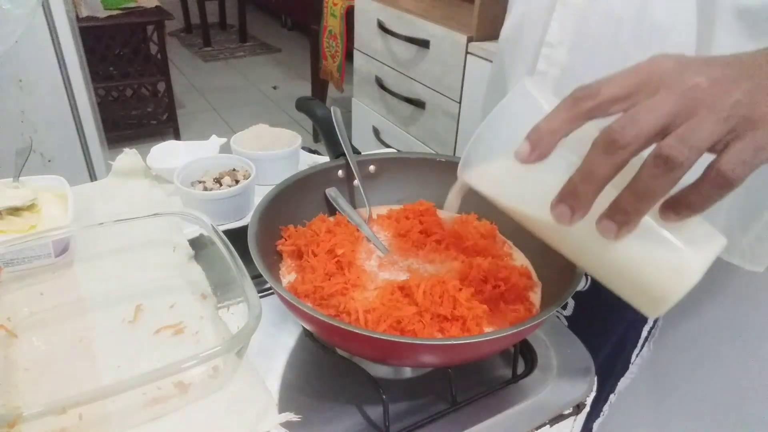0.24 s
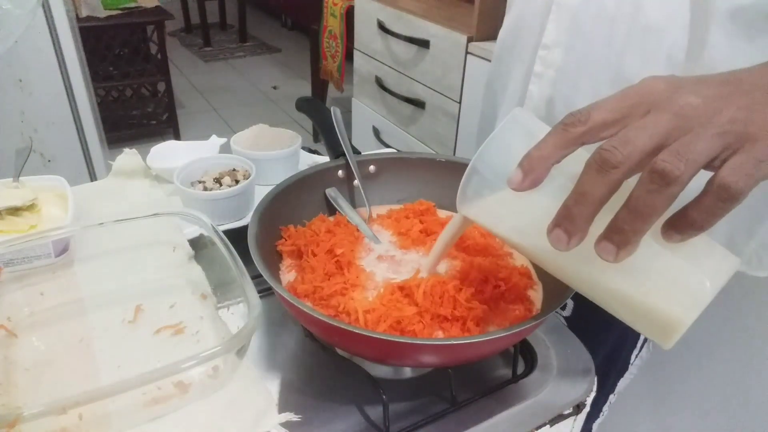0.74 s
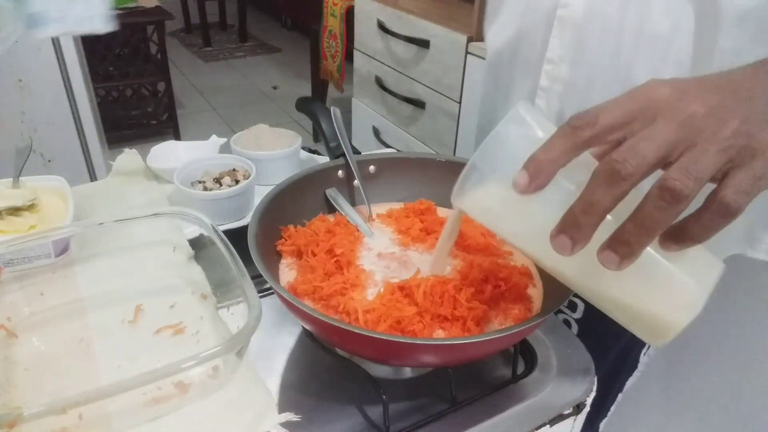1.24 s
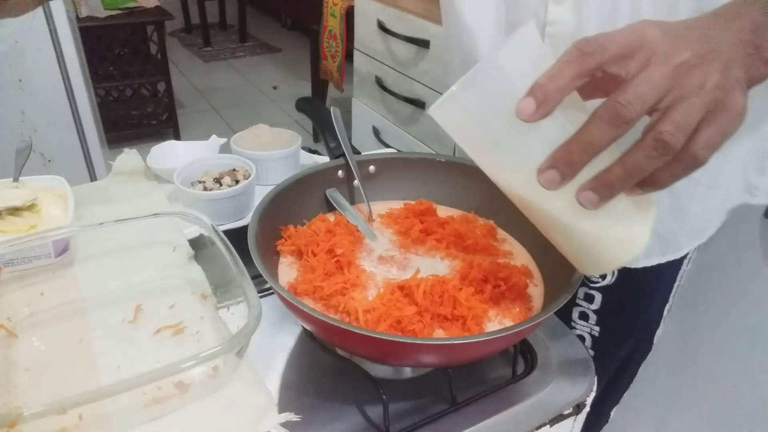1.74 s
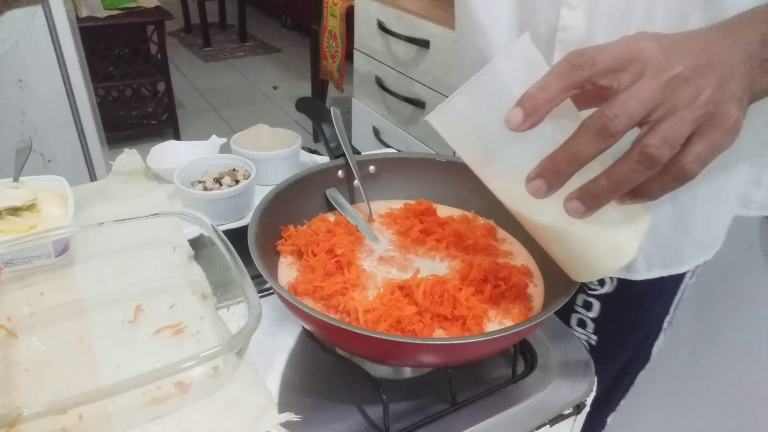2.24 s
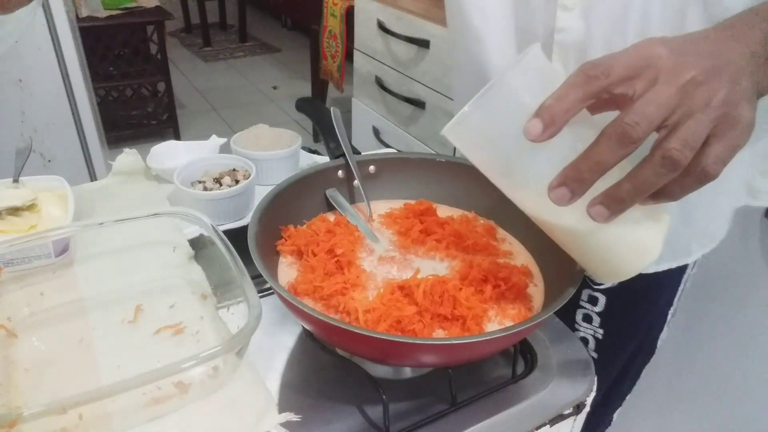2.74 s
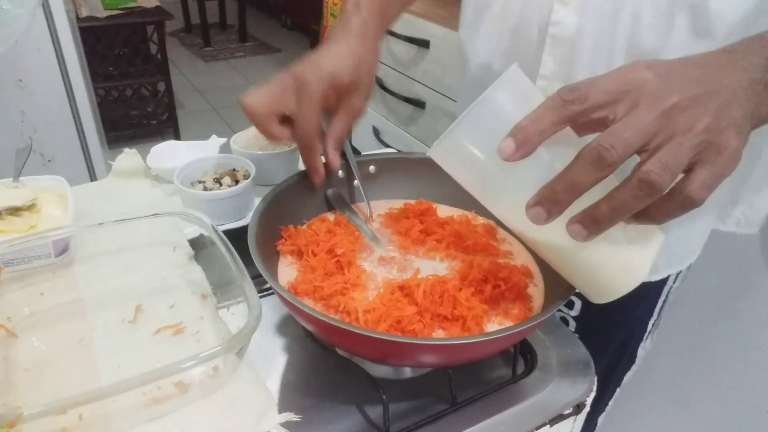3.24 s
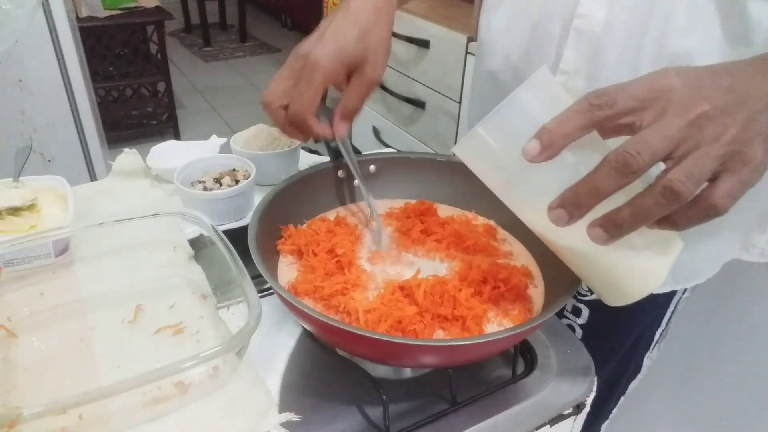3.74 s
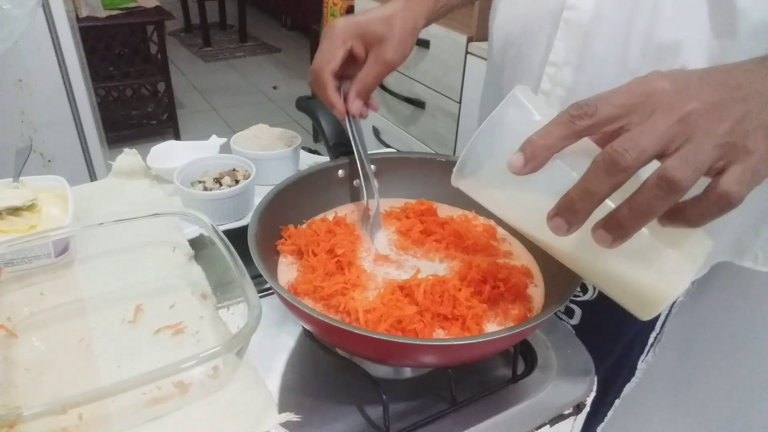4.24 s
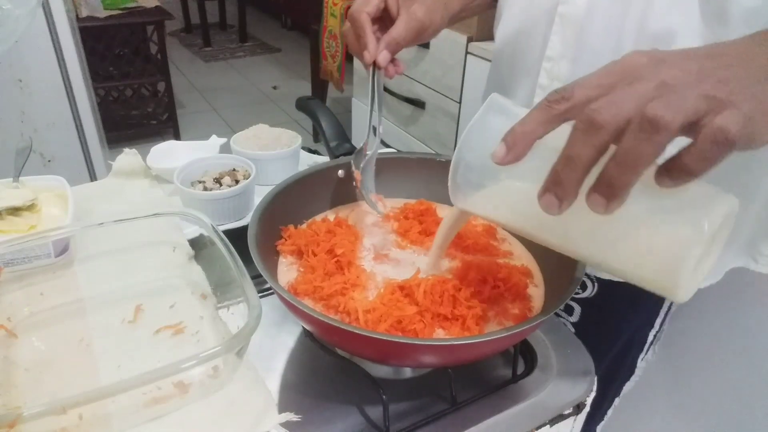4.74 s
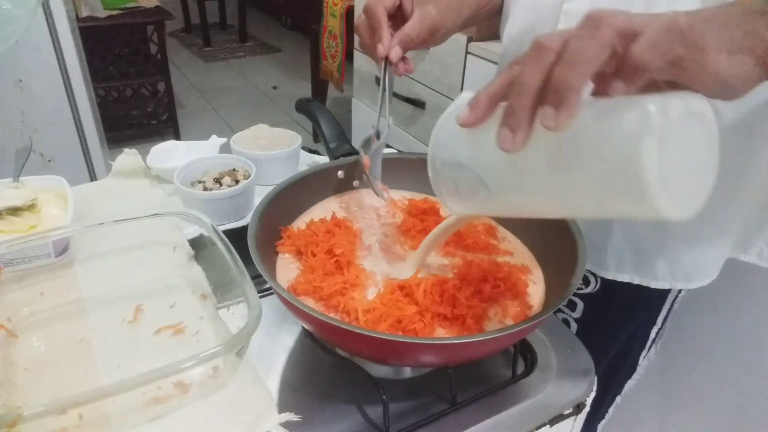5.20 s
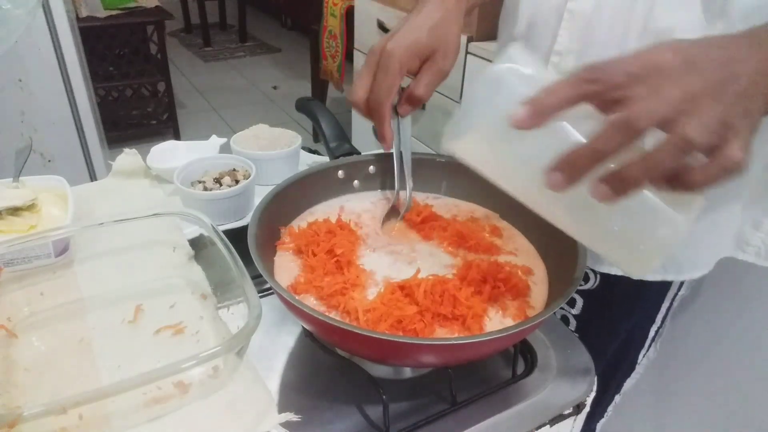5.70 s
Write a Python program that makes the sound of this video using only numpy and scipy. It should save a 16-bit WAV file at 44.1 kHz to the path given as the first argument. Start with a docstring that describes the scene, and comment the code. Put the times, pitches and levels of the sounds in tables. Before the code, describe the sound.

A close microphone in a small, hard-walled kitchen picks up quiet low air, a steady motor hum and a thin high whine that rises slightly near the end. From about 0.2 to 1.6 s milk runs gently onto grated carrot in a frying pan: soft gurgling, fine patter and single drips, strongest near 0.5 s, thinning, then swelling briefly at 1.5 s. At 1.7 s something is shoved roughly over the counter, with short squeaky chattering skids until 2.2 s; faint dull thuds and hollow knocks continue to 3.1 s. At 3.5 to 3.7 s a metal spoon taps, scrapes and knocks in the pan, and at 4.0 s comes the loudest sound, a hard clank with a short damped ring. A light, thin tap follows at 4.5 s. The second pour begins faintly around 4.9 s, strengthens after 5.3 s with crisp splashes and bright drips near 5.5 to 5.6 s, then tapers into trickling.

```python
"""You hear milk poured twice from a jug onto grated carrot in a frying pan, in a small humming kitchen.
The soft stream gurgles and patters as crowds of bubble notes, and sheds splashes and single drips.
Between the pours something skids and bumps on the counter, made of coloured tiny impacts; then a metal spoon
scrapes along the pan and knocks against it, made of noise bursts and fading modes.
The microphone takes each of these directly and off the walls, over still air, a motor's hum and a thin whine."""
import sys
import numpy as np
from scipy import signal
from scipy.fft import rfft, irfft
from scipy.io import wavfile

SR = 44100
rng = np.random.default_rng(int(sys.argv[2]) if len(sys.argv) > 2 else 0)


def digitize_waveform(pressure):
    """Quantize a signal to 16-bit integers and store it at the path in sys.argv[1].

    Rows of a 2-D input are taken as channels; values are limited to [-1, 1].
    """
    field = np.atleast_2d(pressure).T
    bounded = np.clip(field, -1, 1)
    quanta = np.round(bounded * 32767).astype(np.int16)
    wavfile.write(sys.argv[1], SR, quanta)


N = 262920
TIME = np.arange(N) / SR  # s


# The loudest single bubbles and drips: start_s, level_db [peak, dB], pitch_hz, fade_cycles [at least 1 is used]
DRIPS = [(0.3682, -42, 7860, 2.9), (0.373, -42.5, 4260, 7.8), (0.3892, -42, 1026, 3.4),
         (0.467, -58, 1750, 8.2), (0.541, -46, 4230, 5.5), (0.6, -39.5, 10800, 0.97),
         (0.858, -43.5, 7140, 3.3), (1.003, -49.5, 6770, 5.8), (1.267, -52.5, 4600, 9.2),
         (1.358, -47.5, 4400, 2.6), (1.388, -62.5, 2540, 19), (1.498, -56.5, 1756, 9.2),
         (1.521, -42.5, 11470, 9.6), (1.546, -37.5, 3280, 3.5), (5.037, -45.5, 8120, 8.1),
         (5.3278, -43, 5530, 4.9), (5.348, -63, 1330, 32), (5.432, -33.5, 7940, 0.9),
         (5.481, -43, 1044, 4.8), (5.482, -39, 9900, 5), (5.495, -41.5, 1790, 2.9),
         (5.5239, -31, 7400, 3.7), (5.529, -26, 12240, 3.3), (5.5565, -43, 7500, 4.7),
         (5.5901, -23.5, 4250, 1.32), (5.7365, -32, 4690, 2.2)]


def milk(snap_db=-16):
    """The stream sinks into the carrot as a low slosh and large, small and tiny bubbles; single drips stand out."""
    gurgle, patter, spray = stream()
    slosh = froth(330, 900, per_s=900, cycles=4.8, spread_db=2)
    large = froth(850, 2100, per_s=500, cycles=6, spread_db=3)
    blips = froth(1100, 2300, per_s=60, cycles=14, spread_db=2.5)
    small = froth(2600, 8300, per_s=1100, cycles=6, spread_db=3.5)
    tiny = froth(10500, 12200, per_s=600, cycles=3.8, spread_db=1.5)

    out = gurgle * (gain_of(-7) * slosh + gain_of(-5) * large + gain_of(-8.5) * blips)
    out += gain_of(-4.5) * patter * small
    out += gain_of(-0.5) * spray * tiny
    for start_s, level_db, pitch_hz, fade_cycles in DRIPS:
        add(out, start_s, gain_of(level_db) * bubble(pitch_hz, max(fade_cycles, 1)))
        film_snap = bubble(6600, 1 / 2)  # the film snaps as it opens
        add(out, start_s, gain_of(level_db + snap_db) * film_snap)
    return out


# Strength of the stream, one list for each of the two pours: time_s, flow_db [relative]
POURS = [
    [(0.22, -20), (0.36, -17), (0.48, -4), (0.6, -8.5), (0.76, -17.5), (1.0, -21.5), (1.3, -20),
     (1.55, -9.5), (1.63, -56)],
    [(4.85, -38), (5.0, -34.5), (5.25, -28.5), (5.36, -6.5), (5.49, -5), (5.58, -2), (5.7, -15.5),
     (5.82, -11.5), (5.96, -17.5)],
]
# Splashes where the stream meets fresh carrot: start_s, swell_s, fade_s [time constant],
# patter_db, spray_db [dB, before the bubble mix]
SPLASHES = [(0.355, 0.032, 0.032, -54.5, -65.5), (0.56, 0.018, 0.013, -62, -66),
            (0.8, 0.012, 0.04, -71, -71.5), (1.07, 0.021, 0.13, -61.5, -80),
            (1.49, 0.034, 0.038, -61.5, -68), (5.005, 0.04, 0.032, -63.5, -82),
            (5.38, 0.095, 0.02, -53, -64), (5.52, 0.0035, 0.018, -39, -55),
            (5.586, 0.0052, 0.011, -43.5, -68), (5.8, 0.006, 0.16, -58.5, -70)]


def stream(gurgle_db=-55.5, gurgle_power=1.153, patter_db=-57, patter_power=0.93, spray_db=-76.5, spray_power=0.68):
    """Gains of gurgle, patter and spray: each follows a power of the flow; splashes add to the brighter two."""
    flow = sum(level(*np.transpose(pour)) for pour in POURS)
    splash_patter, splash_spray = surges(SPLASHES, start_db=-7)
    gurgle = gain_of(gurgle_db) * flow ** gurgle_power
    patter = np.hypot(gain_of(patter_db) * flow ** patter_power, splash_patter)
    spray = np.hypot(gain_of(spray_db) * flow ** spray_power, splash_spray)
    return gurgle, patter, spray


def bubble(hz, cycles, glide=0.018):
    """A bubble's note: a quick start, a fade, and a slight rise in pitch; peak 1."""
    seconds = np.arange(int(6 * cycles / hz * SR) + 8) / SR
    age = seconds * hz / cycles  # in fade times
    envelope = np.exp(-age) * (1 - np.exp(-6 * age))
    note = envelope * np.sin(2 * np.pi * cycles * age * (1 + glide * age))
    return note / abs(note).max()


def froth(low_hz, high_hz, per_s, cycles, spread_db, count=20):
    """A crowd of small bubbles, set off at random in many sizes; rms 1."""
    pitches = np.geomspace(low_hz, high_hz, count) * rng.uniform(.97, 1.03, count)
    crowd = np.zeros(N)
    for hz in pitches:
        starts = grit(per_s / count, spread_db)
        crowd += evened(signal.oaconvolve(starts, bubble(hz, cycles))[:N])
    return evened(crowd)


# Spoon blows: start_s, clack_db, bright_db [dB per octave], lowest_hz [of the crack],
# pan_ring_db, spoon_ring_db, favoured_hz [pitch the point of contact favours]; levels before the mix
BLOWS = [(3.5054, -39, 1, 584, -67, -44, 7450), (3.589, -25.5, -2, 510, -50.5, -64, 3406),
         (3.695, -26, 31, 2000, -68, -75, 13460), (3.7186, -21, -0.5, 227, -49, -61.5, 1638),
         (4.027, -12.5, 0.5, 145, -27.5, -38.5, 4876), (4.5247, -29.5, 1, 1020, -73.5, -45.5, 3844)]
# Spectrum of the crack: pitch_hz, level_db [relative]
CLACK_SPECTRUM = [(100, 0), (300, -6), (600, -3), (1100, -1), (2100, 1), (2500, 1.5), (4400, 3.5),
                  (5500, 4.5), (8000, -0.5), (9200, -3), (14000, -6), (16000, -26.5)]
# Pitches of the pan's modes: pitch_hz
PAN_HZ = [150, 324.7, 895, 1138, 1302, 1638, 1928, 2207, 2720, 3406, 4157, 4876, 6368, 7892, 9860, 13460]
# The same modes of the pan: level_db [relative], t60_s
PAN_MODES = [(-19, 0.95), (-0.5, 0.48), (-22, 0.4), (-2.5, 0.27), (-28, 0.25), (-2, 0.18), (-5.5, 0.17),
             (-2.5, 0.26), (-11, .26), (-3, 0.19), (1, 0.28), (-10, 0.33), (-5, 0.16), (-6, 0.2),
             (-16, .22), (-7, 0.25)]
# Pitches of the spoon's modes: pitch_hz
SPOON_HZ = [2401, 3004, 3510, 3844, 4538, 5986, 6756, 7450, 12110]
# The same modes of the spoon: level_db [relative], t60_s
SPOON_MODES = [(-5, 0.16), (3, 0.13), (1.5, 0.18), (-10, 0.39), (-6.5, 0.5), (-21.5, .22), (-24.5, .25),
               (-3, 0.088), (-15, 0.21)]


def clacks(contact_s=0.0019, rattle_db=-13, rattle_s=0.027):
    """Each blow is a short crack and a brief rattle against the damped metal; light taps have no bass."""
    out, t = np.zeros(N), TIME[:SR // 4]
    for start_s, clack_db, bright_db, lowest_hz, pan_db, spoon_db, favoured_hz in BLOWS:
        envelope = np.exp(-t / contact_s) + gain_of(rattle_db) * np.exp(-t / rattle_s)
        burst = rng.standard_normal(len(t)) * envelope
        no_bass = signal.lfilter(*signal.butter(3, lowest_hz, "high", fs=SR), burst / 2)
        crack = colour(no_bass, CLACK_SPECTRUM, bright_db)
        metal = gain_of(pan_db) * ring(PAN_HZ, PAN_MODES, bloom_cycles=0.41, favoured_hz=favoured_hz)
        metal += gain_of(spoon_db) * ring(SPOON_HZ, SPOON_MODES, bloom_cycles=0.27, favoured_hz=favoured_hz)
        damped = pressed(crack, metal, damping_s=0.0025)
        add(out, start_s, gain_of(clack_db) * (gain_of(-2) * crack + gain_of(-7) * damped))
    return out


def ringing():
    """The modes of the pan and the spoon ring on after each blow."""
    out = np.zeros(N)
    for start_s, *_, pan_db, spoon_db, favoured_hz in BLOWS:
        pan = ring(PAN_HZ, PAN_MODES, bloom_cycles=9.1, favoured_hz=favoured_hz)
        spoon = ring(SPOON_HZ, SPOON_MODES, bloom_cycles=1.7, favoured_hz=favoured_hz)
        add(out, start_s, gain_of(pan_db) * pan)
        add(out, start_s, gain_of(spoon_db) * spoon)
    return gain_of(-3) * out


# Strokes of the spoon along the pan: start_s, swell_s, fade_s [time constant],
# scrape_db, hiss_db [dB, before the mix]
STROKES = [(3.508, 0.0063, 0.0064, -40, -42.5), (3.605, 0.038, 0.011, -30.5, -42.5),
           (3.725, 0.013, 0.08, -61, -46), (3.848, 0.013, 0.012, -75, -47.5)]
# Spectrum of the catching and slipping: pitch_hz, level_db [relative]
SCRAPE_SPECTRUM = [(100, -15), (400, -13), (800, -5), (1500, -6.5), (2600, -5), (4200, -7.5), (6300, -6),
                   (7000, -16), (9000, -27), (15000, -42.5)]
# Spectrum of the finer grazing: pitch_hz, level_db [relative]
HISS_SPECTRUM = [(1500, -34), (4400, 17.5), (5500, 5.5), (8200, 17.5), (9500, -6.5), (12000, 8),
                 (16000, -8)]


def scrape():
    """The spoon's edge catches and slips on the pan, which rings briefly under it."""
    bite, graze = surges(STROKES, start_db=-9.5)
    slips = colour(bite * grit(per_s=2700, spread_db=4), SCRAPE_SPECTRUM)
    metal = ring(PAN_HZ[3:], PAN_MODES[3:], bloom_cycles=2, favoured_hz=3406, favour_db=5)
    sung = pressed(slips, metal, damping_s=0.012)
    hiss = colour(graze * grit(per_s=8000, spread_db=2), HISS_SPECTRUM)
    return gain_of(-7) * slips + gain_of(-8) * sung + gain_of(-4.5) * hiss


def ring(pitches, modes, bloom_cycles, favoured_hz=0, favour_db=7, split=0.018, twin_db=-8):
    """Ringing metal: modes over 1 kHz have a close, quieter twin; each swells over some cycles, low ones later."""
    t, out = TIME[:SR * 3 // 4], 0
    for hz, (level_db, t60_s) in zip(pitches, modes):
        lift_db = favour_db * np.exp(-abs(favoured_hz / hz - 1) * 20)
        fade = gain_of(-60 * t / t60_s)
        bloom = 1 - np.exp(-t * hz / bloom_cycles)
        twin_tone = np.sin(2 * np.pi * (hz * (1 + split) * t + rng.random()))
        twin = gain_of(twin_db) * (hz > 1000) * np.sqrt(fade) * twin_tone
        tone = np.sin(2 * np.pi * (hz * t + rng.random()))
        out = out + gain_of(level_db + lift_db) * fade * bloom * (tone + twin)
    return out


def pressed(x, metal, damping_s):
    """Sound passed through ringing metal that is damped by the contact; unit energy gain."""
    short = metal * np.exp(-TIME[:len(metal)] / damping_s)
    return signal.oaconvolve(x, short / np.linalg.norm(short))[:len(x)]


# Something shoved over the counter in skids: start_s, swell_s, fade_s [time constant],
# rasp_db, chatter_db [dB, before the mix]
SKIDS = [(1.722, 0.05, 0.049, -37, -49), (1.995, 0.027, 0.01, -69, -54), (2.049, 0.0027, 0.048, -62, -51),
         (2.097, 0.021, 0.02, -51, -37.5), (2.16, 0.008, 0.01, -66, -60), (2.2, 0.005, 0.033, -85, -48)]
# Spectrum of the rough shove: pitch_hz, level_db [relative]
RASP_SPECTRUM = [(60, -9), (130, -2), (500, -5.5), (1200, -3), (1700, -1.5), (2400, -1), (3400, -7),
                 (4600, -5.5), (5400, -17), (5800, -10), (6500, -23), (8100, -19), (8800, -30),
                 (15000, -33.5)]
# Spectrum of the chattering skids: pitch_hz, level_db [relative]
CHATTER_SPECTRUM = [(700, -21), (1100, -29), (1350, -0.5), (1550, -2), (1750, 2.5), (2100, 2.5),
                    (2650, -0.5), (3200, -15), (4100, -4), (5200, -18.5), (7900, -19.5), (9000, -34)]


def slide(squeak_hz=1780, squeak_width_hz=200):
    """A rough shove, then short chattering skids with a squeaky resonance in them."""
    shove, judder = surges(SKIDS, start_db=-11)
    rasp = colour(shove * grit(per_s=3900, spread_db=3), RASP_SPECTRUM)
    skids = colour(judder * grit(per_s=650, spread_db=1), CHATTER_SPECTRUM)
    squeak = signal.lfilter(*signal.iirpeak(squeak_hz, squeak_hz / squeak_width_hz, SR), skids)
    return gain_of(-1) * rasp + gain_of(-4.5) * (skids + squeak)


# Dull judders of the counter: start_s, length_s, thud_db, knock_db [dB, before the mix], knock_hz
BUMPS = [(1.893, 0.04, -52.5, -46, 612), (1.952, 0.081, -53, -47.5, 634), (2.1, 0.038, -52, -40.5, 593),
         (2.355, 0.036, -88, -51.5, 615), (2.713, 0.04, -53, -52, 587), (2.749, 0.047, -54, -43, 631),
         (2.814, 0.031, -71, -39, 675), (2.835, 0.075, -50.5, -47, 609), (3.039, 0.041, -52.5, -47.5, 752),
         (3.055, 0.022, -79, -38.5, 703)]
# Spectrum of the thud: pitch_hz, level_db [relative]
THUD_SPECTRUM = [(50, -22), (100, -3.5), (170, 0.5), (330, -4.5), (600, -7), (900, -18), (1300, -30),
                 (1750, -20.5), (2500, -34.5), (8000, -34.5), (15000, -46)]


def bumps(ring_share=0.31):
    """Runs of small slips shake the counter: a juddering thud together with a hollow, fading knock."""
    out, slips, t = np.zeros(N), grit(per_s=2500, spread_db=0.5), TIME[:SR // 4]
    for start_s, length_s, thud_db, knock_db, knock_hz in BUMPS:
        push = np.zeros(len(t))
        span = min(int(length_s * SR), len(t))
        push[:span] = evened(slips[int(start_s * SR):][:span] * signal.windows.tukey(span, .3))
        envelope = np.exp(-t / (ring_share * length_s)) * (1 - np.exp(-t * knock_hz))
        knock = envelope * np.sin(2 * np.pi * knock_hz * t)
        add(out, start_s, gain_of(thud_db) * colour(push, THUD_SPECTRUM))
        add(out, start_s, gain_of(knock_db) * knock)
    return gain_of(-3) * out


# Still air in the kitchen: pitch_hz, level_db [per Hz, relative]
AIR_SPECTRUM = [(25, -27.5), (45, -4), (60, -8.5), (85, 1), (130, -1), (250, -4.5), (430, -8.5),
                (600, -4.5), (800, -14), (1500, -21), (2500, -23), (6000, -22), (9000, -27), (15500, -23)]
# A motor's steady low lines: pitch_hz
HUM_HZ = [59.2, 118.4, 177.2, 528.6, 588.3, 1116]
# Level of each low line: level_db [rms, dB]
HUM_DB = [-77, -79.5, -73.5, -74.5, -79.5, -91]
# Two swells of the hum's note near 530 Hz: start_s, swell_s, fade_s [time constant], level_db [before the mix]
HUM_SWELLS = [(0, 0.014, 0.15, -65), (0.78, 0.13, 0.22, -61)]
# The motor's thin high lines: pitch_hz
WHINE_HZ = [4232, 7058, 7208, 7359, 7515, 10637]
# Level of each high line: level_db [rms before the slow drift, dB]
WHINE_DB = [-73.5, -91.5, -78, -82.5, -87, -85.5]
# Spectrum of the hiss around the whine: pitch_hz, level_db [relative]
WHINE_HISS = [(3900, -40), (4130, -19.5), (4230, -9.5), (4340, -8), (4600, -13), (4850, -22.5), (6700, -42),
              (7250, -15.5), (7900, -16), (8300, -43)]
# Slow drift of the whine and its hiss: time_s, gain_db
WHINE_DRIFT = [(0, -6.5), (3.6, -5.5), (4.7, -8), (6, -2.5)]


def background():
    """Still air as coloured noise, a motor's hum, and a thin whine that sinks, then rises near the end."""
    air = gain_of(-71) * colour(rng.standard_normal(N + SR), AIR_SPECTRUM)[SR:]  # filter start-up cut off
    note = gain_of(-4) * lines([532], [0]) + gain_of(-4) * narrow(510, 110)
    hum = lines(HUM_HZ, HUM_DB) + surges(HUM_SWELLS, start_db=-8)[0] * note
    whine = lines(WHINE_HZ, WHINE_DB)
    whine += gain_of(-72.5) * colour(rng.standard_normal(N), WHINE_HISS)
    drift = gain_of(np.interp(TIME, *np.transpose(WHINE_DRIFT)))
    return air + hum + whine * drift


def lines(pitches, levels_db, waver=0.28):
    """Steady tones, each with a slightly wavering skirt of narrow noise."""
    out = np.zeros(N)
    for hz, level_db in zip(pitches, levels_db):
        tone = np.sqrt(2) * np.sin(2 * np.pi * (hz * TIME + rng.random()))
        out += gain_of(level_db) * (tone + waver * narrow(hz, 7.4))
    return out


def narrow(hz, width_hz):
    """A wavering line: noise in a narrow band, rms 1."""
    f = np.fft.rfftfreq(N, 1 / SR)
    band = 1 / (1 + (2 * (f - hz) / width_hz) ** 2)
    return evened(irfft(rfft(rng.standard_normal(N)) * band, N))


# Decay of the kitchen's reflections: pitch_hz, t60_s
ROOM_DECAY = [(100, 0.67), (400, 0.75), (1000, 0.43), (3000, 0.37), (7000, 0.34), (15000, 0.31)]


def kitchen(x, first_s=0.0038):
    """Reflections from hard walls: sparse random taps, each band dying at its own speed; unit energy."""
    taps = rng.standard_normal(SR) * (rng.random(SR) < 4000 / SR) * (TIME[:SR] > first_s)
    hz, t, bands = signal.stft(taps, SR, nperseg=256)
    decay = gain_of(-60 * t / read(ROOM_DECAY, hz)[:, None])
    tail = signal.istft(bands * decay, SR, nperseg=256)[1]
    return signal.oaconvolve(x, tail / np.linalg.norm(tail))[:N]


def gain_of(db):
    """Decibels to amplitude."""
    return 10 ** (np.asarray(db) / 20)


def evened(x):
    """Scales to rms 1."""
    return x / np.sqrt(np.mean(x ** 2) + 1e-20)


def read(points, hz):
    """A table of (pitch_hz, value), joined on a log axis."""
    f, value = np.transpose(points)
    return np.interp(np.log(hz + 1), np.log(f + 1), value)


def level(s, db):
    """A gain curve over the whole scene, silent outside its points."""
    return gain_of(np.interp(TIME, s, db)) * (TIME >= s[0]) * (TIME <= s[-1])


def surge(start_s, swell_s, fade_s, start_db):
    """A gain curve that sets in at start_db, swells to full strength, then dies away."""
    age, swell_s = TIME - start_s, max(swell_s, 1e-3)
    swell = gain_of(start_db * np.clip(1 - age / swell_s, 0, 1))
    fade = np.exp(-np.maximum(age - swell_s, 0) / fade_s)
    return (age >= 0) * swell * fade


def surges(rows, start_db):
    """Rows of (start_s, swell_s, fade_s, level_db, ..) to one gain curve for each level column."""
    return sum(np.outer(gain_of(levels_db), surge(start_s, swell_s, fade_s, start_db))
               for start_s, swell_s, fade_s, *levels_db in rows)


def add(mix, start_s, sound):
    """Mixes a sound in at its start time, cut at the end of the scene."""
    part = mix[max(round(start_s * SR), 0):][:len(sound)]
    part += sound[:len(part)]


def colour(x, points, tilt_db=0, size=4096):
    """Causal minimum-phase filter of unit energy with the given spectrum, tilted per octave above 500 Hz."""
    hz = abs(np.fft.fftfreq(size, 1 / SR))
    tilt = tilt_db * np.log2(np.maximum(hz, 500) / 4000)
    log_gain = np.log(gain_of(read(points, hz) + tilt))
    taps = np.fft.ifft(np.exp(np.conj(signal.hilbert(log_gain)))).real[:size // 2]
    return signal.oaconvolve(x, taps / np.linalg.norm(taps))[:len(x)]


def grit(per_s, spread_db):
    """Random tiny impacts, a few larger than the rest; rms 1."""
    size = gain_of(spread_db * np.minimum(rng.exponential(1, N), 3))
    hits = rng.choice([-1, 1], N) * (rng.random(N) < per_s / SR)
    return evened(size * hits)


def scene():
    """Pour, spoon and counter reach the microphone directly and by the walls; the background is added as it is."""
    pour = milk()
    spoon = clacks() + scrape()
    rings = ringing()
    counter = slide() + bumps()
    to_walls = gain_of(-2.5) * pour + spoon + gain_of(-20.5) * rings + gain_of(-7) * counter
    return (pour + spoon + rings + counter + kitchen(to_walls) + background())[None]


def record(dry):
    """The microphone loses the deep bass below 45 Hz; then the treble is cut off above 15750 Hz."""
    thin = signal.sosfilt(signal.butter(3, 45, "high", fs=SR, output="sos"), dry)
    band_limit = signal.firwin(511, 15750, window=("kaiser", 9), fs=SR)
    return signal.oaconvolve(thin, band_limit[None], "same")


dry = scene()
out = record(dry)
digitize_waveform(out)
```